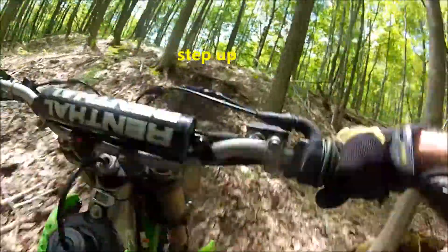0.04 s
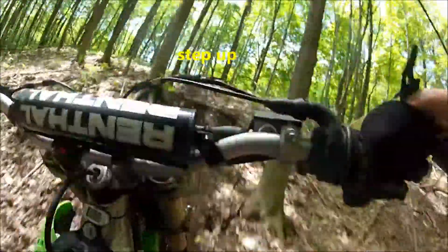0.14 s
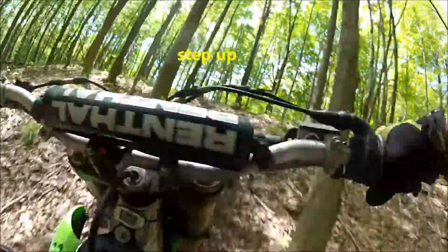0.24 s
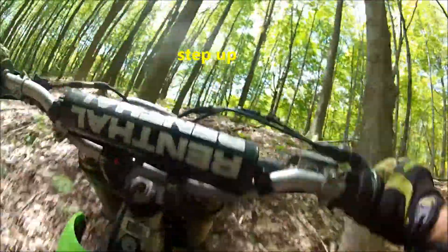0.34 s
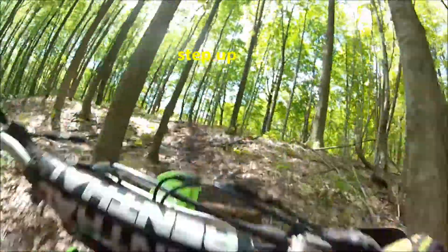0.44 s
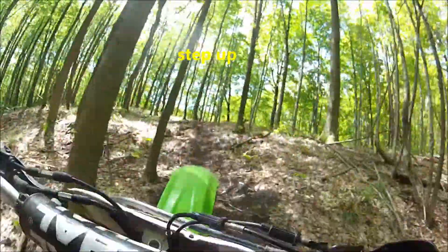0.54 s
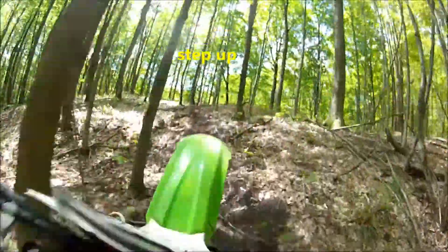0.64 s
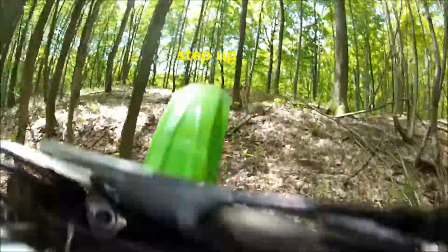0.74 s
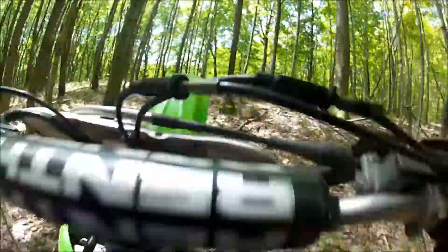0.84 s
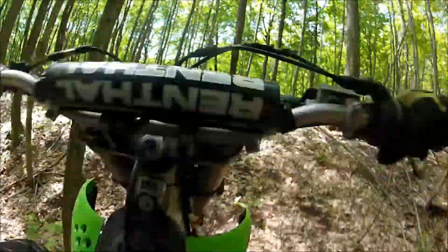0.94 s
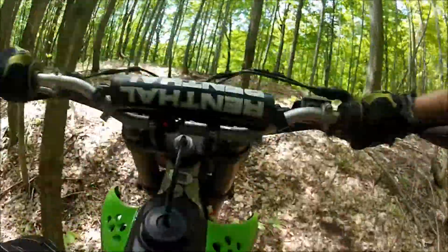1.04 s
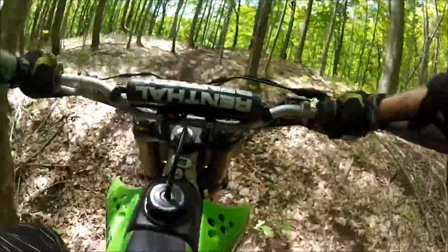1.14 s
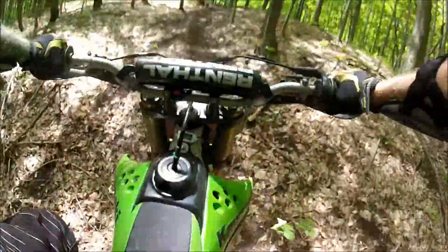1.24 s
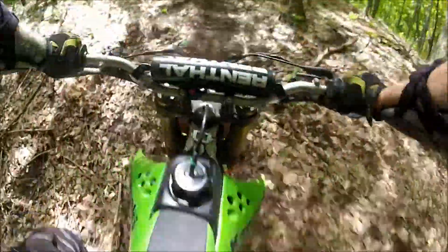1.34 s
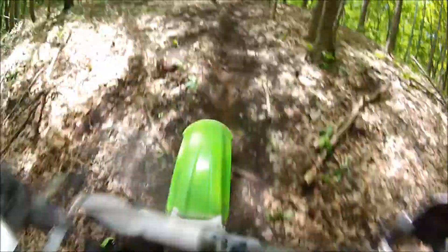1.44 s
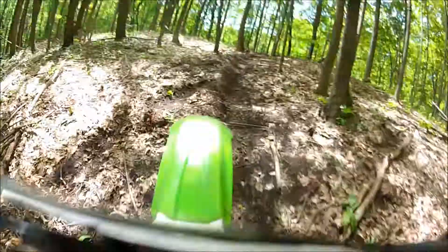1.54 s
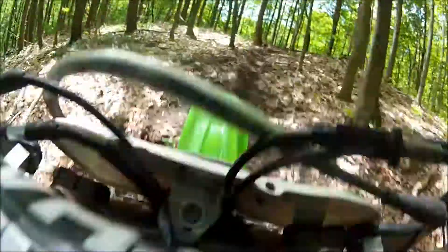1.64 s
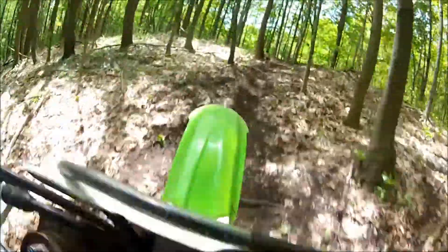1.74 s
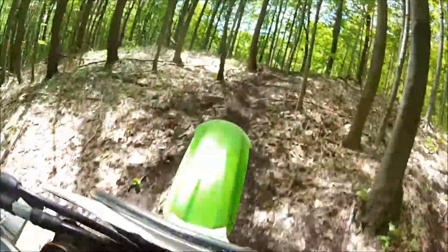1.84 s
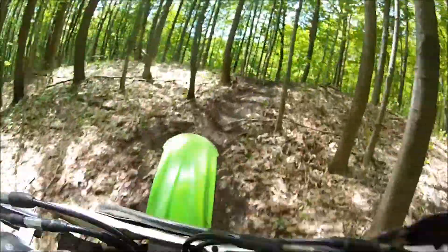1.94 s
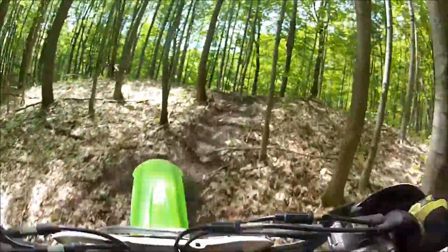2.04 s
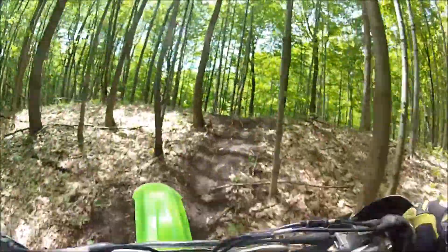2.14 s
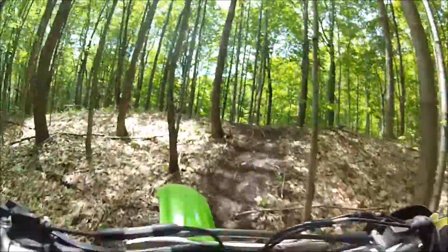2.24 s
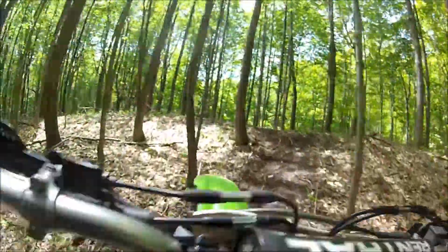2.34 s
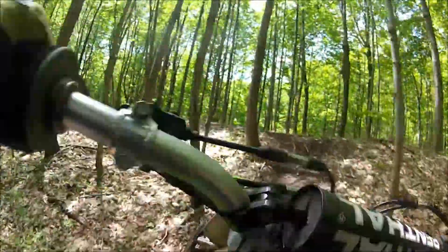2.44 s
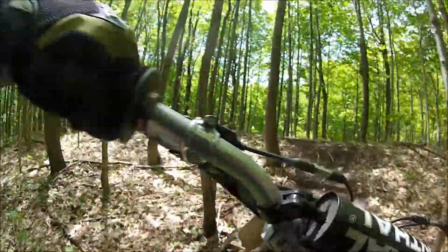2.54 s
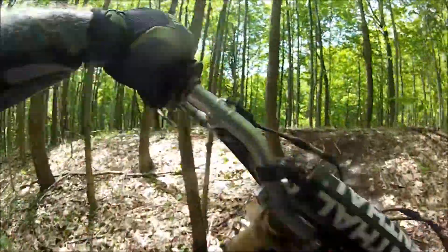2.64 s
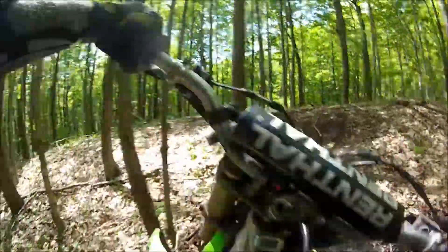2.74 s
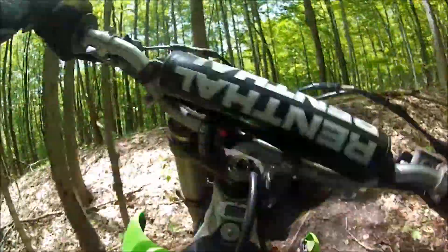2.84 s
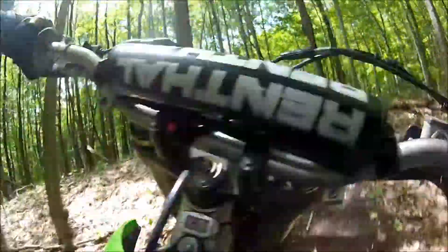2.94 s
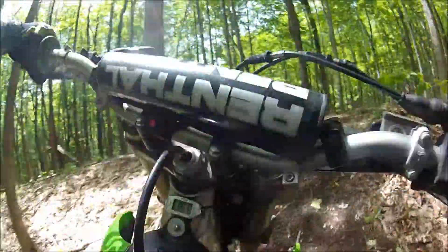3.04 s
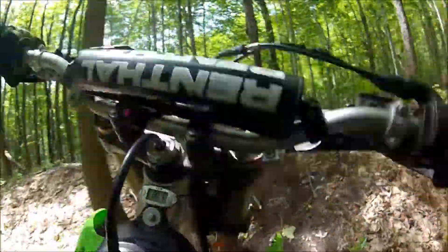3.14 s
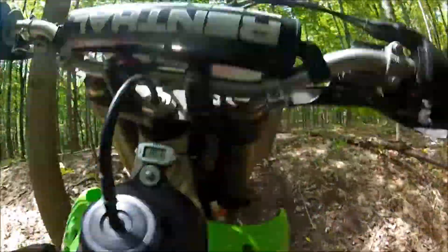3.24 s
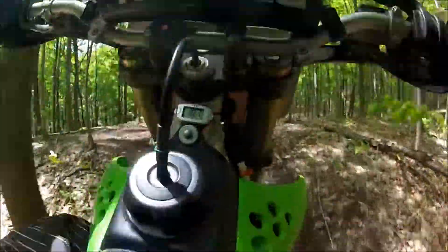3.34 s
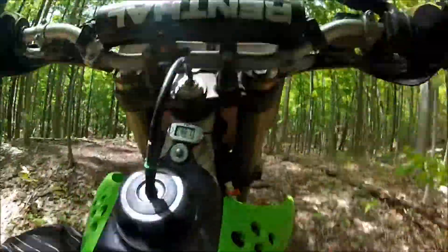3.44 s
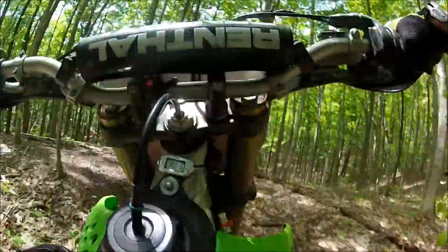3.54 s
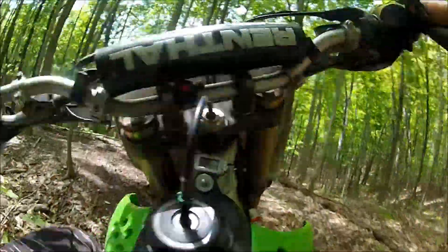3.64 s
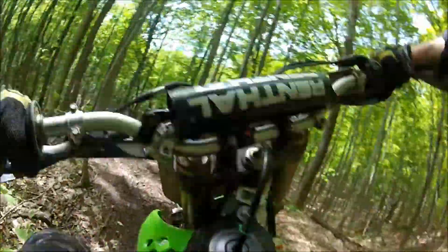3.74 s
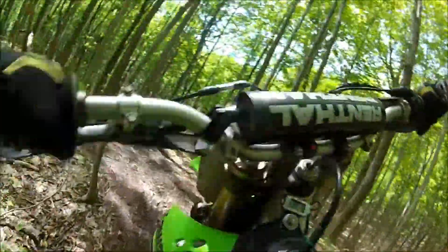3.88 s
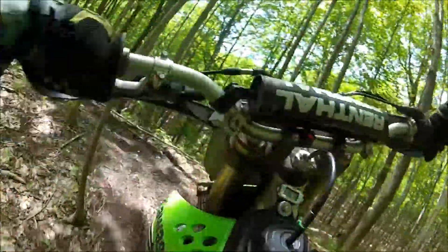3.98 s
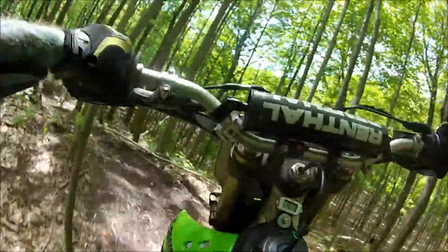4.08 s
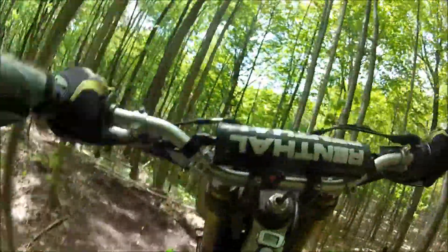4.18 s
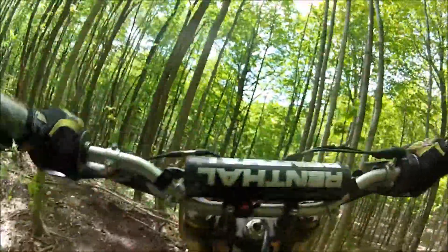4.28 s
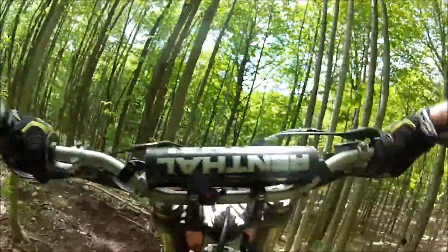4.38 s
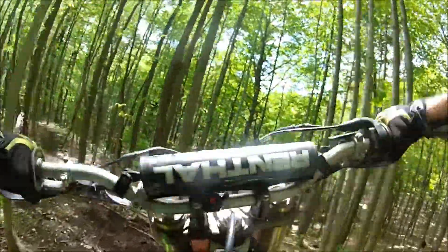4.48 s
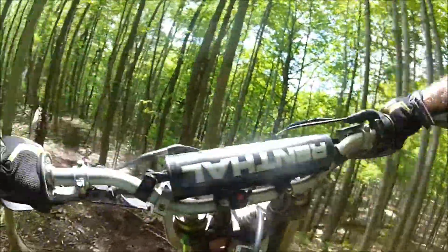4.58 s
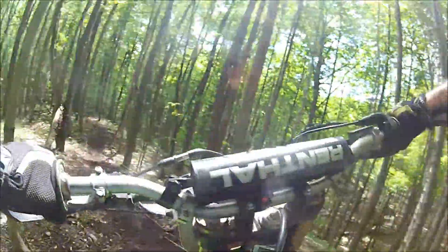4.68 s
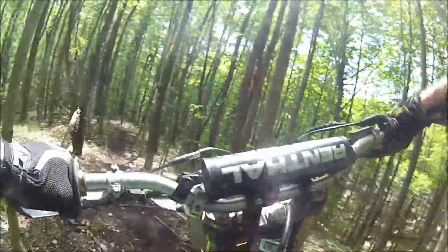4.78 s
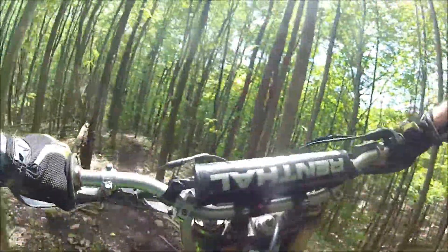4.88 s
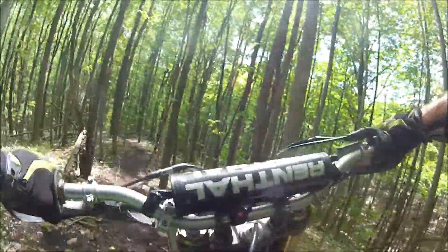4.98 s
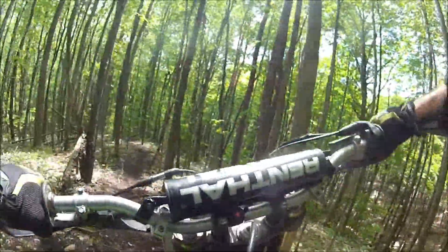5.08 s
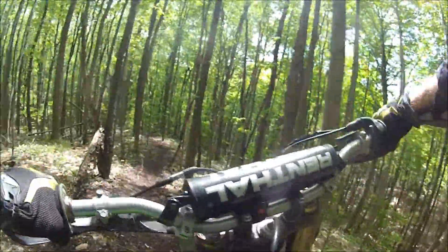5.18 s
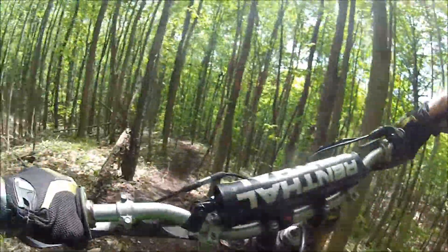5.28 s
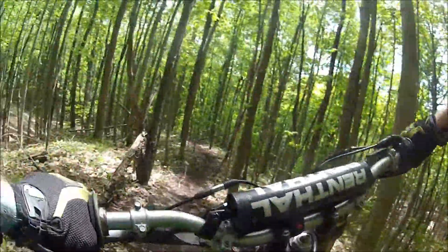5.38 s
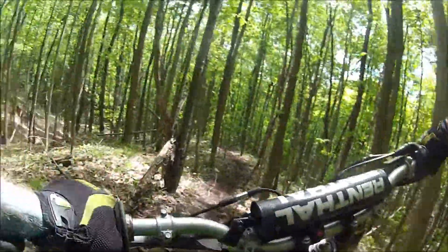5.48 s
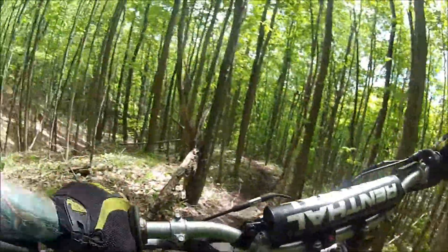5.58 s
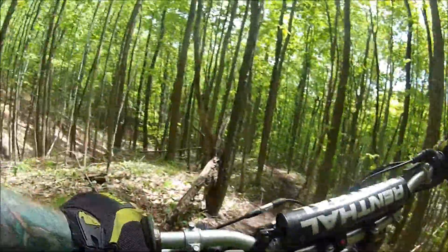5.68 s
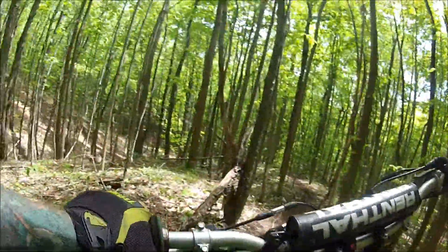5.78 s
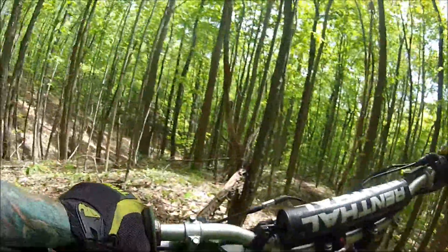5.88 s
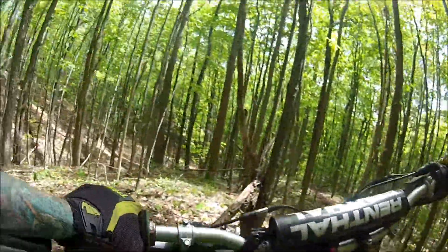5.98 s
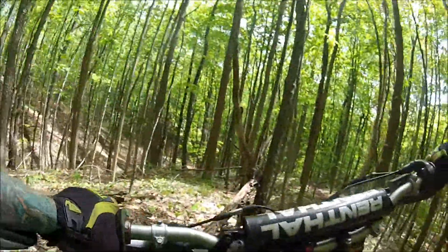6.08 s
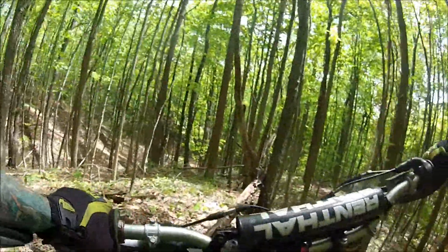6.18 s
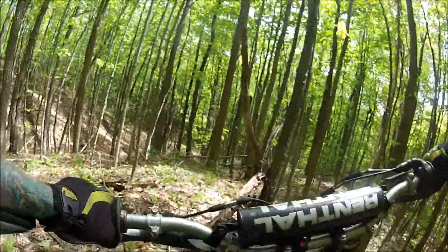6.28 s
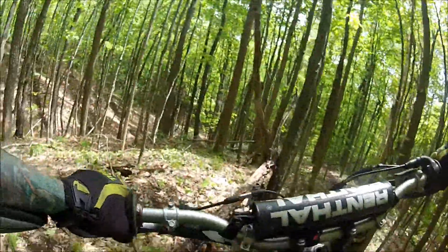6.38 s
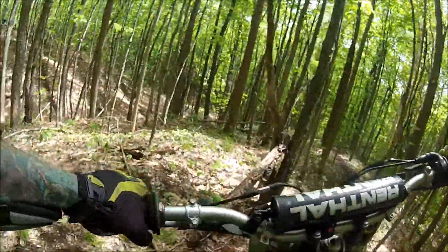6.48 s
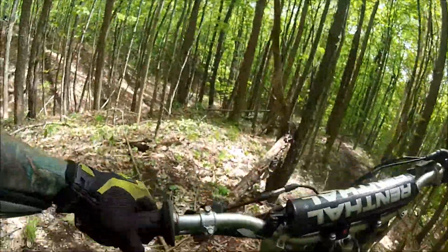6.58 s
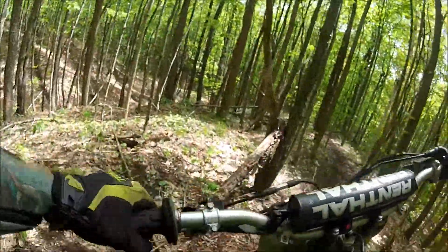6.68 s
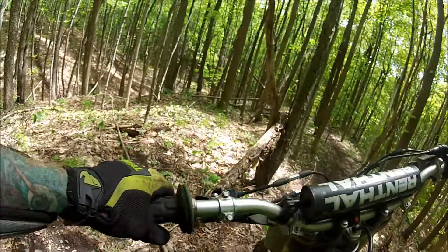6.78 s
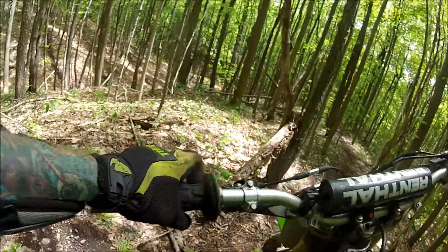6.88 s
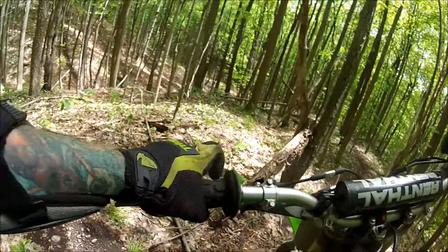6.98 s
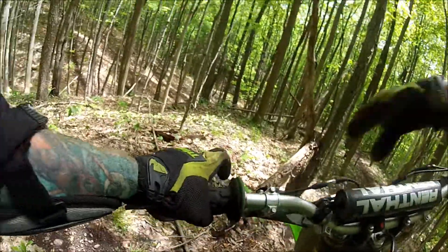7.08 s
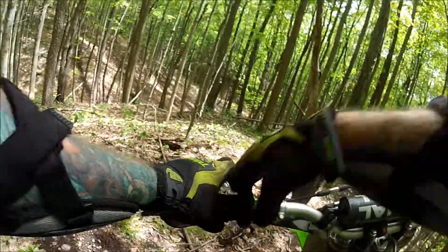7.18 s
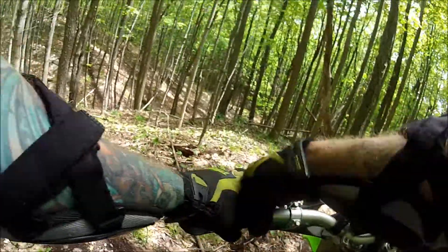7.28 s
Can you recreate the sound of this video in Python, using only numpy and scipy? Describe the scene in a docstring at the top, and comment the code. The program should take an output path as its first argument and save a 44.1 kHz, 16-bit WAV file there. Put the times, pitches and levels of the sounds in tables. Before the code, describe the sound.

Close, choppy throttle bursts from a four-stroke dirt bike, with hard knocks and wind rumble, settling into a slow idle with light scuffs.

```python
"""A rough forest trail, heard close up from the rider's helmet camera, in mono.
A single-cylinder four-stroke dirt bike climbs in bursts of throttle, then slows to a thumping idle.
Every firing knocks the engine cases and puffs through the silencer; bumps make the bike clack and
rattle. Gear scuffs, a brake squeaks and wind rumbles on the helmet. The camera limits and clips the
hardest blows and holds its samples at a low rate, which adds a treble fizz."""
import sys
import numpy as np
from scipy import signal
from scipy.fft import rfft, irfft, next_fast_len
from scipy.io import wavfile
from scipy.ndimage import uniform_filter1d, map_coordinates

SR = 44100
rng = np.random.default_rng(int(sys.argv[2]) if len(sys.argv) > 2 else 0)


def dump_mix(stems):
    """Bounce the given channels to the path in sys.argv[1] as a 16-bit WAV at rate SR."""
    frames = np.atleast_2d(stems).T  # one column per channel
    limited = np.clip(frames, -1, 1)  # hard clip at full scale
    pcm = np.round(limited * 32767).astype(np.int16)
    wavfile.write(sys.argv[1], SR, pcm)


N = 322812
TIME = np.arange(N) / SR

# spectrum of the plastic bodywork and frame: (frequency [Hz], level [dB])
BODYWORK = [(200, -40.5), (600, -8), (800, -8.5), (1030, 1.5), (1130, -1.5), (1280, 4.5), (1500, -3),
            (1900, 0.5), (2250, -3), (2600, -9.5), (3700, -15), (5500, -31.5)]


def exhaust(cycle, speed, boom_db, bark_db):
    """Each blowdown rings silencer, pipe and one engine case mode; turbulence lingers between firings."""
    # silencer resonances: (frequency [Hz], width [Hz], level [dB])
    silencer_modes = [(86, 37, -9), (132, 38, -5.5), (185.4, 34, 2.5), (240, 63, 0.5), (319, 72, -7)]
    # exhaust pipe resonances, plus the engine cases' 1.3 kHz ring that sounds with the bark:
    # (frequency [Hz], width [Hz], level [dB])
    bark_modes = [(316, 45, 1.5), (529, 75, -0.5), (708, 71, -4), (838, 59, -3.5), (1020, 56, -28),
                  (1287, 23, -2.5)]
    steady_rate = 144  # firings per second; combustion grows more uneven the further below this
    uneven = amp(np.clip(steady_rate / speed - 1, 0, 2.6) * wobble(24))
    blowdown = uneven * strokes(cycle + .003 * speed, scatter_db=1, jitter_s=.00005)
    # the intake gulp, later in the cycle, grows with engine speed
    gulp = np.clip(speed / 70 - .1, .2, .55) * strokes(cycle - .27, scatter_db=1.2, jitter_s=.00005)
    gas = blowdown - gulp
    turbulence = bursts(blowdown, rise=.003, decay=.018, rough=.9)
    burble = np.clip(22 / speed - .25, .1, .7)  # more gas noise towards idle
    boom = unit(ring(gas, silencer_modes)) + .7 * burble * unit(ring(turbulence, silencer_modes))
    rasp = bursts(blowdown, rise=.002, decay=.016, rough=.15)
    bark = unit(ring(gas, bark_modes)) + (.4 + burble) * unit(ring(rasp, bark_modes))
    return amp(boom_db) * unit(boom) + amp(bark_db) * unit(bark)


def clatter(cycle, speed, clatter_db):
    """Combustion knocks the cases before the exhaust opens; the valves follow, harder at speed."""
    # engine case resonances: (frequency [Hz], width [Hz], level [dB])
    case_modes = [(1267, 37, 5), (1868, 33.6, 6.5), (2180, 156, 2.5), (2333, 20, 4.5), (2573, 25, -6),
                  (3014, 71, -3.5), (3664, 70, -5.5), (5130, 460, -17)]
    knock = strokes(cycle + .28, scatter_db=1.5, jitter_s=.0003)
    first_valve = strokes(cycle + .03, scatter_db=2, jitter_s=.0003)
    second_valve = strokes(cycle - .32, scatter_db=2, jitter_s=.0003)
    blows = knock + np.clip(speed / 50 - .4, .25, .9) * (first_valve + .7 * second_valve)
    # the case modes near 2.2 kHz swell up and sing after each blow
    singing = ring(ring(blows, case_modes), [(2197, 240, 0)])
    ping = np.clip(speed / 20 - .5, .3, 1) * unit(singing)
    scrape = unit(ring(bursts(blows, rise=.0019, decay=.0054, rough=.87), case_modes))
    # the even whirr of the gears takes over towards idle
    whirr = np.clip(22 / speed - .4, .32, .8) * unit(ring(rng.standard_normal(N), case_modes))
    return amp(clatter_db) * unit(.95 * ping + .56 * scrape + whirr)


def intake(cycle, speed, boom_db):
    """The airbox honks while the engine gains speed."""
    acceleration = uniform_filter1d(np.gradient(speed) * SR, size=SR // 12)
    pull = np.clip(acceleration / 110, 0, 1) * np.clip((speed - 30) / 10, 0, 1)
    gulps = strokes(cycle - .27, scatter_db=.7, jitter_s=.00003)
    honk = unit(ring(gulps, [(262, 26, 0), (116, 25, -9)]))
    return 1.2 * pull * amp(boom_db) * honk


def engine_levels(speed):
    """Boom, bark, rattle and clatter in dB: engine speed sets them and throttle load shifts them."""
    # throttle shut: (speed [firings/s], boom [dB], bark [dB], rattle [dB], clatter [dB])
    coasting_levels = [(14.3, -46.5, -58, -48, -50), (19.8, -50, -58.5, -45.5, -48),
                       (28.7, -42, -49, -34.5, -38), (42.7, -36, -41.5, -30.5, -32),
                       (62.5, -32.5, -35, -21, -29), (89.5, -32.5, -32, -20, -23.5)]
    # throttle twists and what their load adds:
    # (opens [s], shuts [s], boom [dB], bark [dB], rattle [dB], clatter [dB])
    twists = [(0.422, 0.57, 4, 14, 2, 2), (0.589, 0.744, -1.5, 11, -0.5, 6), (1.255, 1.52, -1, 8.5, 0.5, 2),
              (1.687, 1.884, -7.5, 13, -2, 9.5), (1.883, 2.025, -3, 11, -2, 7.5),
              (2.244, 2.654, -2.5, 12.5, 0, 8), (2.684, 2.891, 3.5, 9, 6, 6.5),
              (2.903, 3.005, 0, 7.5, 0.5, 8), (3.325, 3.47, 2.5, 15.5, 8, 11),
              (3.502, 3.658, 1.5, 1, 0.5, 8.5), (3.807, 4.07, 5, 9, 2, 1.5)]
    rates, *columns = np.transpose(coasting_levels)
    coasting = np.array([np.interp(np.log(speed), np.log(rates), db) for db in columns])
    load = sum(np.outer(load_db, swell(opens, shuts, rise=.025, fall=.046))
               for opens, shuts, *load_db in twists)
    return coasting + load


def rattle(cycle, speed, rattle_db):
    """Chain and loose plastic chatter irregularly; at high revs the bodywork buzzes with the firing."""
    # spells of extra shaking: (start [s], end [s], level [dB])
    shakes = [(-0.02, 0.06, -25), (0.906, 0.972, -30), (1.423, 1.519, -14.5), (2.648, 2.78, -23.5),
              (3.02, 3.117, -21.5), (3.41, 3.44, -16.5), (4.16, 4.30, -48)]
    shake_power = sum((amp(db) * swell(start, end, rise=.044, fall=.012)) ** 2
                      for start, end, db in shakes)
    level = np.sqrt(amp(rattle_db) ** 2 + shake_power)
    ticks = bursts(contacts(per_second=260, scatter_db=5.7), rise=.0005, decay=.004, rough=1)
    chatter = unit(ticks + .7 * rng.standard_normal(N))
    kicks = strokes(cycle + .3, scatter_db=2.5, jitter_s=.00005)
    buzz = bursts(kicks, rise=.0018, decay=.031, rough=.27)
    buzz_share = np.clip(speed / 80, .2, .8)
    shaking = np.sqrt(1 - buzz_share) * chatter + np.sqrt(buzz_share) * buzz
    return level * unit(colour(shaking, BODYWORK))


def bumps():
    """Each blow is a hard clack with a low thud, a bright snap and a brief shiver of the bodywork."""
    # blows from the trail:
    # (time [s], level [dB], thud [dB re clack], snap [dB re clack], clack pitch [ratio])
    blows = [(0.066, -32, -11, -17, 1.02), (0.416, -38.5, 3, -27, 1.01), (0.452, -31.5, -2, -27.5, 0.91),
             (0.877, -19.5, -12.5, -12, 0.92), (1.046, -38, -13, -19, 0.68),
             (1.252, -23.5, -10.5, -30, 1.006), (1.572, -10.5, -4.5, -10, 1.11),
             (1.616, -22, -14, -9, 1.15), (1.656, -11.5, -6.5, -8, 1.02), (2.697, -29, -7.5, -34.5, 1.07),
             (3.092, -28.5, -5, -13, 0.8), (3.122, -32.5, -2, -2.5, 0.93), (3.144, -25, -10.5, -8, 0.99),
             (3.319, -29.5, -7.5, -15.5, 0.95), (3.356, -37.5, -16, -9, 0.92),
             (3.809, -19.5, -10, -5, 1.04), (3.971, -28, -6, -16, 0.81), (4.091, -20, -18, -14, 1.05),
             (4.104, -8.5, -15, -12.5, 1.1), (4.147, -16, -14.5, -9, 1.01), (4.179, -30.5, -6, -1, 0.92),
             (4.222, -48, -15, 2, 0.6), (4.629, -34.5, 1, -36.5, 0.83), (6.195, -50.5, -3, -23.5, 0.86),
             (7.306, -35, -14.5, -11.5, 1.05)]
    # a hard blow through fork and frame: (frequency [Hz], level [dB])
    clack_spectrum = [(100, -34), (250, -20), (450, -12), (750, -29), (1030, 3.5), (1300, 0), (1550, -4.5),
                      (1950, 9.5), (2300, -6.5), (2650, -6.5), (3700, -31.5), (5500, -78.5)]
    # the bright edge of metal on metal: (frequency [Hz], level [dB])
    snap_spectrum = [(1200, -45), (2000, -36), (2500, -8), (3000, 5), (3700, 8.5), (4400, -10.5),
                     (5600, -14)]
    t = np.arange(SR // 8) / SR
    track = np.zeros(N + len(t))

    def noise_burst(decay):
        return unit(rng.standard_normal(len(t)) * np.exp(-t / decay))

    for start, db, thud_db, snap_db, pitch in blows:
        impact = unit(t == 0) + .78 * noise_burst(.0017)
        clack = unit(colour(impact, np.multiply(clack_spectrum, [pitch, 1])))
        shiver = unit(colour(noise_burst(.0074), BODYWORK))
        thud = unit(ring(np.exp(-t / .00075), [(204.5, 27, -2.5), (283, 116, -6)]))
        snap = unit(colour(noise_burst(.0022), snap_spectrum))
        blow = clack + amp(-5.5) * shiver + amp(thud_db) * thud + amp(snap_db) * snap
        track[round(start * SR):][:len(t)] += amp(db) * blow
    return track[:N]


def scuffs():
    """Plastic and riding gear catch and slip in tiny contacts as the bike slows."""
    # spells of rubbing: (start [s], end [s], level [dB])
    rubs = [(4.488, 4.581, -30.5), (4.648, 4.77, -41.5), (5.51, 5.556, -25), (5.60, 5.66, -38.5),
            (5.678, 5.727, -34), (6.167, 6.253, -32.5), (6.967, 7.184, -41.5), (7.238, 7.32, -35.5)]
    # the dull rasp of a scuff: (frequency [Hz], level [dB])
    rasp_spectrum = [(100, -27), (250, -1.5), (500, -17), (800, -16), (1050, 2.5), (1500, -6), (2050, -3.5),
                     (2600, -18.5), (3700, -22.5), (5500, -39.5)]
    slips = bursts(contacts(per_second=420, scatter_db=1), rise=.0005, decay=.0037, rough=.97)
    level = sum(amp(db) * swell(start, end, rise=.019, fall=.028) for start, end, db in rubs)
    return level * unit(colour(slips, rasp_spectrum))


def squeak():
    """A brake pad sings briefly, rising in pitch, as the bike stops."""
    start_s, end_s, glide_hz_per_s = 6.77, 6.815, 1420
    hz = 2150 + glide_hz_per_s * (TIME - start_s) + 12 * wobble(170)
    envelope = swell(start_s, end_s, rise=.015, fall=.015)
    return amp(-38) * envelope * np.sin(2 * np.pi * np.cumsum(hz) / SR)


def wind():
    """Air rumbles on the helmet, right at the microphone, and gusts when the rider is jolted."""
    # gusts on the helmet: (start [s], end [s], level [dB])
    gusts = [(0.42, 0.80, -40.5), (1.10, 1.17, -41), (1.55, 1.74, -37), (2.552, 2.95, -41.5),
             (3.03, 3.127, -38), (3.266, 3.42, -44), (3.773, 3.82, -34), (3.948, 4.02, -39)]
    # wind rumble: (frequency [Hz], level [dB])
    rumble_spectrum = [(15, 0.5), (30, -9), (41, -3.5), (55, -8), (120, -10), (300, -13), (1500, -74)]
    steady = amp(-52)
    gusting = sum(amp(db) * swell(start, end, rise=.032, fall=.075) for start, end, db in gusts)
    return np.hypot(steady, gusting) * unit(colour(rng.standard_normal(N), rumble_spectrum))


def hiss():
    """The faint even hiss of the microphone."""
    return amp(-60) * rng.standard_normal(N)


def amp(db):
    """Decibels to gain."""
    return 10 ** (np.asarray(db) / 20)


def unit(x):
    """Scaled to rms 1."""
    return x / np.sqrt(np.mean(x ** 2) + 1e-20)


def swell(start, end, rise, fall):
    """0 to 1 and back: rises from start, holds, falls from end; all in seconds."""
    return np.clip(np.minimum((TIME - start) / rise, 1 - (TIME - end) / fall), 0, 1)


def wobble(rate):
    """A smooth random curve, rate knots a second."""
    return map_coordinates(rng.standard_normal(4096), [TIME * rate], mode="wrap")


def strokes(cycle, scatter_db, jitter_s):
    """One pulse per engine cycle, sized so that the power does not depend on speed."""
    turns = np.arange(1, int(cycle[-1]) + 1)
    size, slip = rng.standard_normal((1000, 2))[:len(turns)].T
    at = np.searchsorted(cycle, turns) + (slip * jitter_s * SR).astype(int)
    at = np.clip(at, 0, N - 1)
    return np.bincount(at, amp(scatter_db * size) / np.sqrt(np.gradient(cycle)[at]), N)


def contacts(per_second, scatter_db):
    """Pulses of uneven size at random moments."""
    chance, size = rng.random(N), rng.standard_normal(N)
    return (chance < per_second / SR) * amp(scatter_db * np.clip(size, -2, 2))


def bursts(pulses, rise, decay, rough):
    """A noise burst per pulse: partly the same each time, which gives pitch, partly new (share rough)."""
    t = np.arange(SR // 16) / SR
    shape = (1 - np.exp(-t / rise)) * np.exp(-t / decay)
    repeated = signal.fftconvolve(pulses, shape * rng.standard_normal(len(t)))[:N]
    fresh = signal.fftconvolve(pulses, shape)[:N] * rng.standard_normal(N)
    return np.sqrt(1 - rough) * unit(repeated) + np.sqrt(rough) * unit(fresh)


def filtered(x, response):
    """x through a complex response of frequency."""
    size = 2 * next_fast_len(len(x) // 2 + 4096)
    hz = np.fft.rfftfreq(size, 1 / SR)
    return irfft(rfft(x, size) * response(hz), size)[:len(x)]


def ring(x, modes):
    """x through resonances of alternating sign: (frequency [Hz], width [Hz], level [dB])."""
    def response(f):
        return sum((-1) ** k * amp(db) * 1j * f * width / (hz * hz - f * f + 1j * f * width)
                   for k, (hz, width, db) in enumerate(modes))
    return filtered(x, response)


def colour(x, outline):
    """x through a minimum-phase filter with this outline: (frequency [Hz], level [dB])."""
    hz, db = np.transpose(outline)

    def response(f):
        gain = amp(np.interp(np.log(f + 1), np.log(hz), db))
        cepstrum = irfft(np.log(gain))
        half = len(cepstrum) // 2
        causal_fold = np.r_[1, np.full(half - 1, 2), 1, np.zeros(half - 1)]
        return np.exp(rfft(cepstrum * causal_fold))
    return filtered(x, response)


def scene():
    """At the helmet: the engine cycle drives the bike just below; the trail adds the rest."""
    # engine speed: (time [s], speed [firings/s])
    revs = [(0.0, 54.89), (0.391, 36.71), (0.511, 58.06), (0.61, 57.37), (0.73, 65.13), (0.802, 43.41),
            (0.948, 28.77), (1.219, 31.28), (1.403, 59.55), (1.535, 87.07), (1.626, 47.88), (1.748, 31.43),
            (2.053, 39.16), (2.197, 23.53), (2.41, 29.24), (2.529, 28.01), (2.813, 36.48), (2.966, 56.02),
            (3.019, 56.0), (3.279, 22.9), (3.428, 31.91), (3.549, 52.07), (3.854, 28.97), (4.047, 39.99),
            (4.177, 40.37), (4.511, 20.55), (4.757, 15.76), (5.055, 20.31), (5.382, 19.36), (5.676, 17.24),
            (6.282, 14.98), (6.453, 15.46), (6.678, 14.79), (7.32, 15.95)]
    # lulls in which the unloaded engine falls away: (start [s], end [s], gain [dB])
    lulls = [(0.29, 0.375, 0), (2.125, 2.22, -3), (3.702, 3.777, -8.5)]
    speed = np.interp(TIME, *np.transpose(revs))
    cycle = .33 + np.cumsum(speed) / SR  # running count of engine cycles
    boom_db, bark_db, rattle_db, clatter_db = engine_levels(speed)
    bike = exhaust(cycle, speed, boom_db, bark_db)
    bike += clatter(cycle, speed, clatter_db)
    bike += intake(cycle, speed, boom_db)
    bike += rattle(cycle, speed, rattle_db)
    lull_db = sum(db * swell(start, end, rise=.035, fall=.035) for start, end, db in lulls)
    return (amp(lull_db) * bike + bumps() + scuffs() + squeak() + wind() + hiss())[None]


def limiter(x, ceiling_db, recovery_db_per_s, lag_s):
    """Overloads pull the gain down a moment late; it recovers at a steady rate."""
    over_db = np.maximum(20 * np.log10(np.abs(x) + 1e-9) - ceiling_db, 0)
    recovery_db = recovery_db_per_s * TIME
    cut_db = np.maximum.accumulate(over_db + recovery_db) - recovery_db
    pole = np.exp(-1 / (lag_s * SR))
    return x * amp(-signal.lfilter([1 - pole], [1, -pole], cut_db))


def record(dry):
    """The helmet camera limits, clips and holds samples, mirroring the sound around the hold rate."""
    hold_hz, top_hz = 12000, 15500
    limited = limiter(dry[0], ceiling_db=-5.5, recovery_db_per_s=247, lag_s=.0059)
    clipped = np.clip(signal.resample_poly(limited, hold_hz, SR), -1, 1)
    held = signal.resample_poly(np.repeat(clipped, 8), SR, 8 * hold_hz)[:N]
    return filtered(held, lambda hz: hz < top_hz)[None]


dry = scene()
out = record(dry)
dump_mix(out)
```